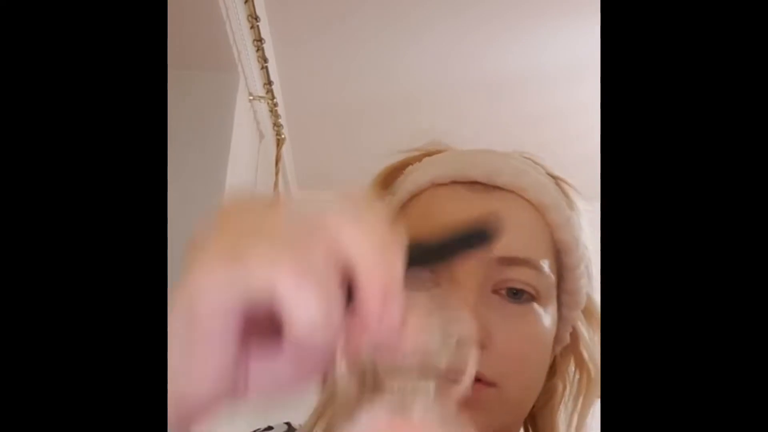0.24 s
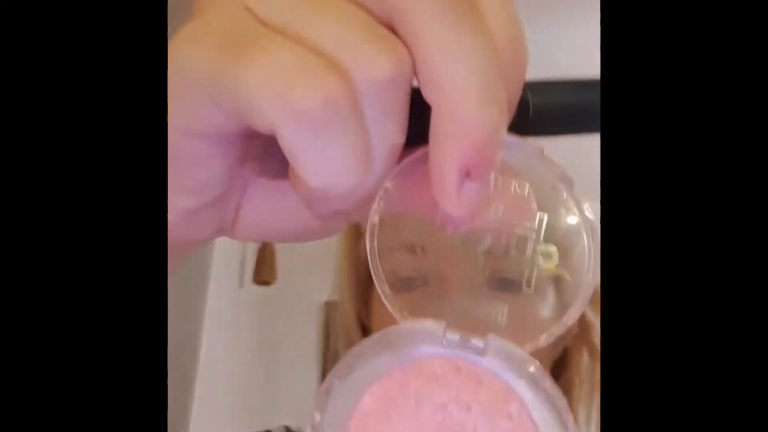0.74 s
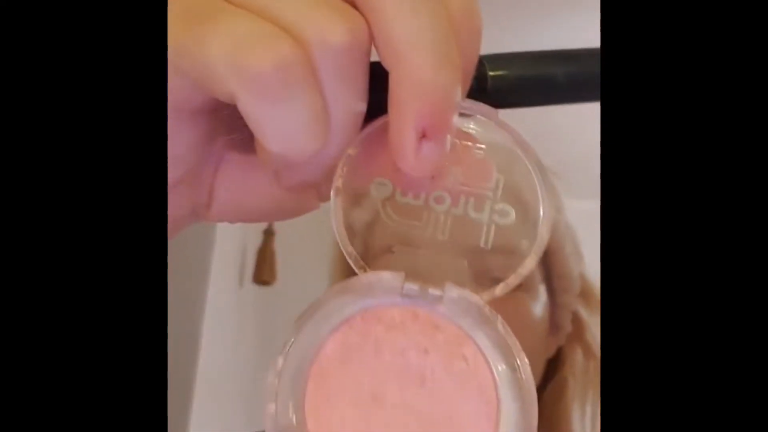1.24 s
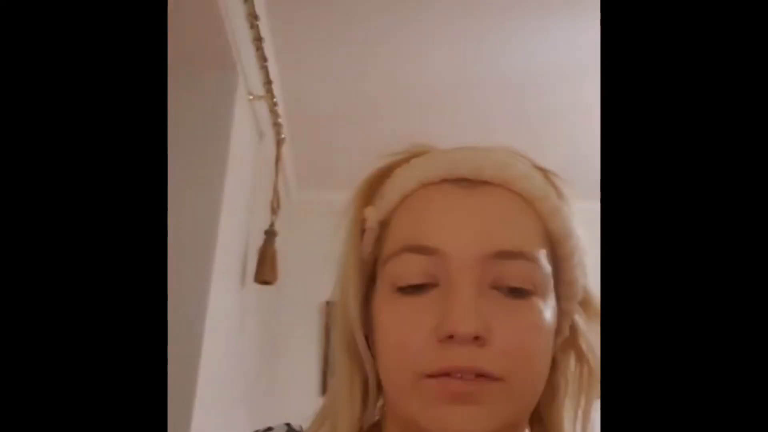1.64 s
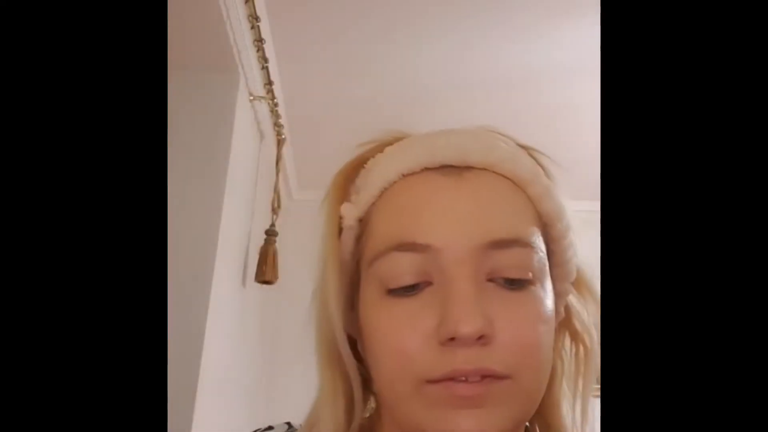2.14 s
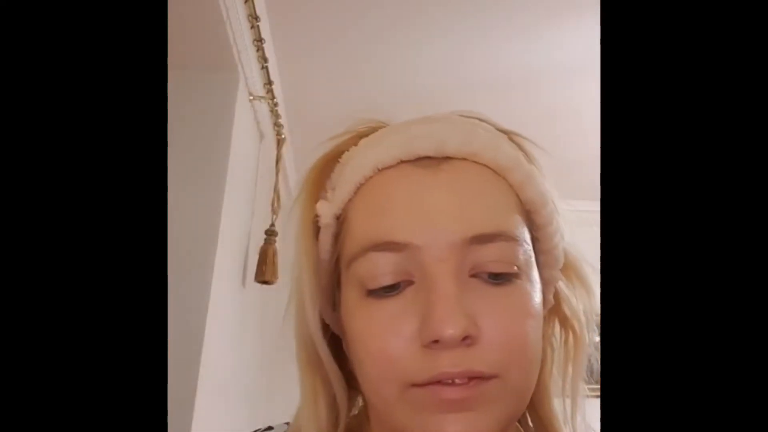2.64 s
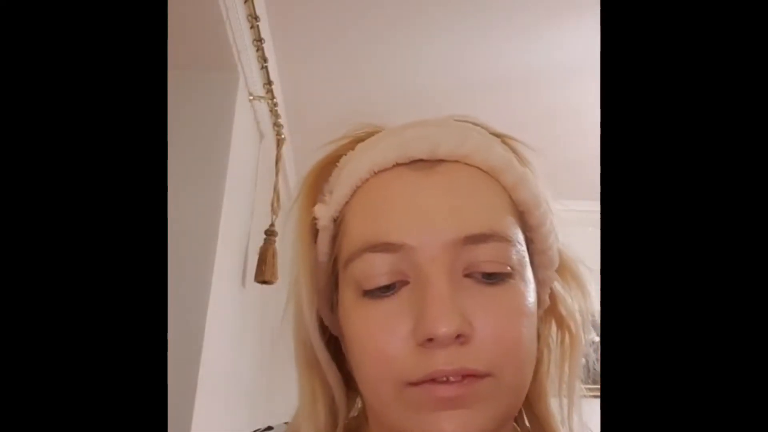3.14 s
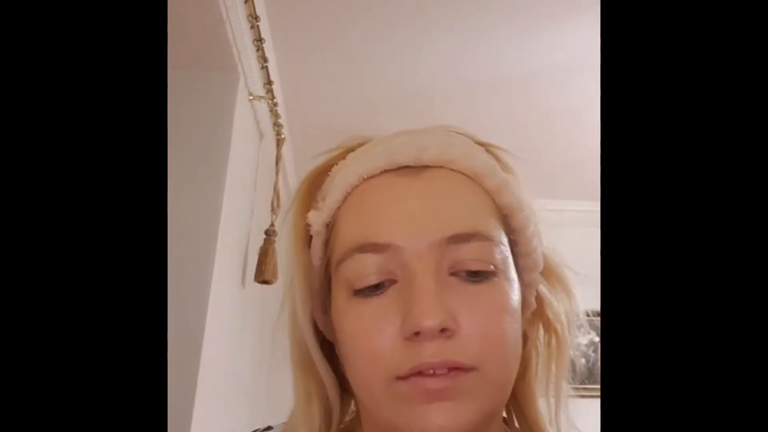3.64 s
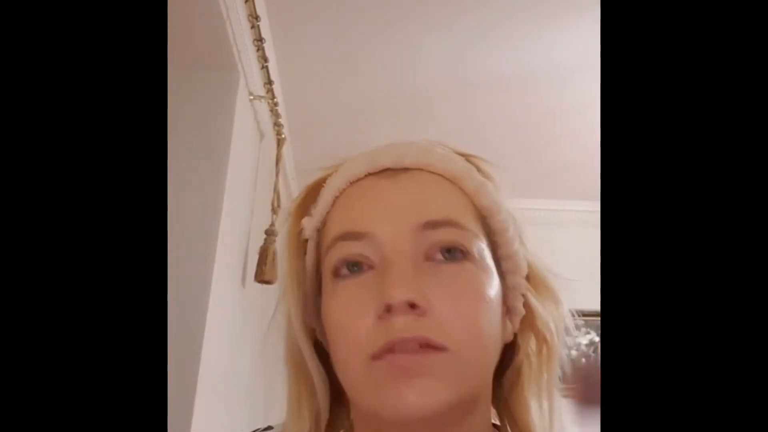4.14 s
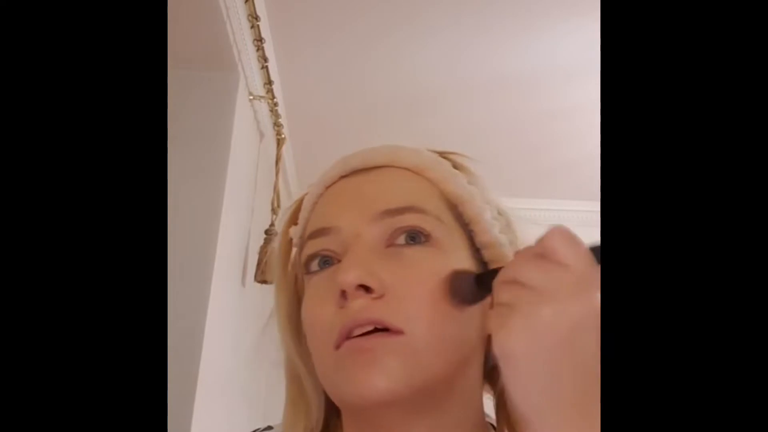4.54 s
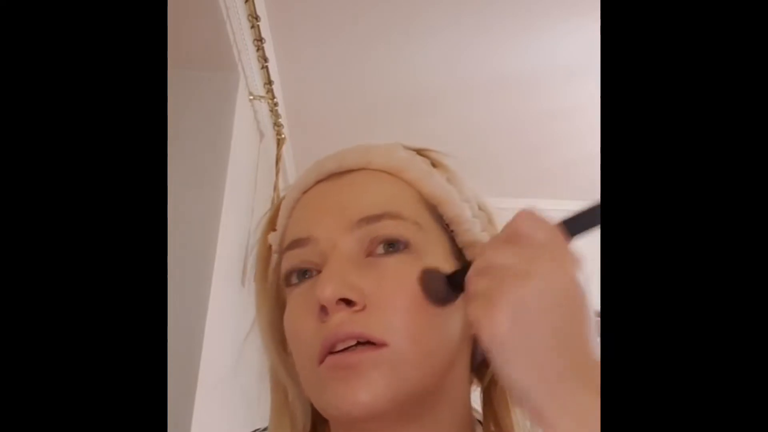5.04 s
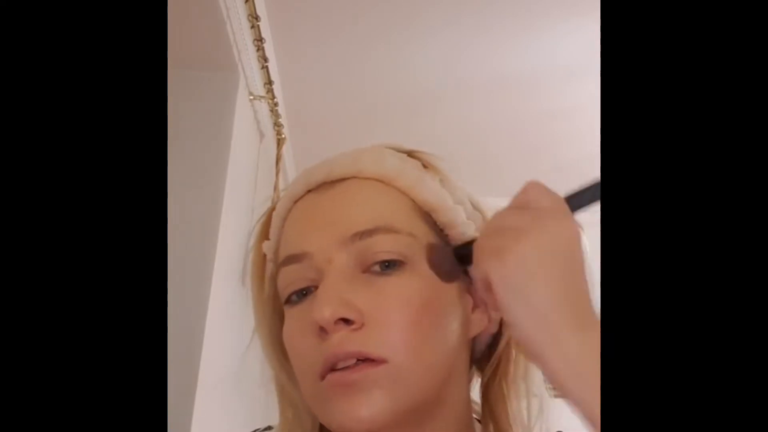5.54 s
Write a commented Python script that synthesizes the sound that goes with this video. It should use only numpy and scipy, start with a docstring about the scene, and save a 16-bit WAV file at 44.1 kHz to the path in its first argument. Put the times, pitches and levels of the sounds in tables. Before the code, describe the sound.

A plastic compact clicks open, is set down with a knock, then a brush handle taps it evenly and is laid down with a rattle.

```python
"""Powder compact and brush

A compact clicks open, its case is set down and nudged, the brush handle taps it and the brush is laid down
with a rattle. Each contact cracks, chatters, rings the plastic and thumps the table; the catch has no thump.
Soft bumps and dull knocks close the scene. A faint noise rustle wavers from amid the taps to the end, over a
wavering hum and hiss of noise bands; a small furnished room adds a few echoes and a short noise-like tail."""
import sys
import numpy as np
from scipy import signal
from scipy.fft import rfft, irfft
from scipy.io import wavfile
from scipy.ndimage import uniform_filter1d

SR = 44100
rng = np.random.default_rng(int(sys.argv[2]) if len(sys.argv) > 2 else 0)


def decibels_to_gain(level_db):
    """Convert a level in decibels to a linear amplitude gain (20 dB per decade)."""
    exponent = np.asarray(level_db, float) / 20
    return 10 ** exponent


def master(y):
    """Save y as 16-bit WAV."""
    cut = np.clip(np.atleast_2d(y).T, -1, 1)
    pcm = np.round(cut * 32767)  # scale
    wavfile.write(sys.argv[1], SR, pcm.astype(np.int16))


N = 255780  # length in samples


def colour(hz, points):
    """Reads a spectrum table at any frequency, in dB, along a logarithmic frequency axis."""
    table_hz, table_db = np.transpose(points)
    return np.interp(np.log(np.maximum(hz, 1)), np.log(table_hz), table_db)


def shaped(gain, size):
    """Two unrelated noises with the given gain per frequency bin."""
    return irfft(rfft(rng.standard_normal((2, size))) * gain, size)


def ring(modes, db, phase, seconds, rise_s=0.00021):
    """Sum of decaying modes, with extra dB and start phase per mode; they build up while contact lasts."""
    hz, mode_db, t60 = np.transpose(modes)[:, :, None]
    t = np.arange(int(seconds * SR)) / SR
    decay = np.exp(-np.log(1000) * t / t60)
    waves = decay * np.sin(2 * np.pi * hz * t + phase[:, None])
    return decibels_to_gain(mode_db[:, 0] + db) @ waves * (1 - np.exp(-t / rise_s)) ** 2


def add(out, s, sound):
    """Mixes a sound in at a time in seconds."""
    i = int(s * SR)
    out[i:i + len(sound)] += sound[:N - i]


# wavering hum bands: f/Hz, width/Hz, level/dB (rms of the part alike left and right)
HUM_BANDS = [(69.5, 7.9, -68.5), (156, 24, -79.5), (197, 3.5, -82), (242, 8, -88), (287, 3.8, -84),
             (340, 2.1, -79.5), (382, 8, -87), (440.7, 7.7, -77)]
# spectrum of air and microphone noise: f/Hz, relative level/dB (per Hz)
HISS_SPECTRUM = [(13, -39.5), (22, -15), (76, 2.5), (90, -0.5), (112, -29.5), (152, -17.5), (205, -27),
                 (223, -27), (347, -26.5), (409, -33), (444, -23), (569, -39.5), (1200, -46), (2700, -42),
                 (4380, -47.5), (9000, -60), (16000, -71)]


def background(hiss_db=-58.5, alike_hz=790.0, low_spread=0.089):
    """Narrow noise bands waver as hum over hiss; the bass is nearly alike left and right, the treble is not."""
    hz = np.fft.rfftfreq(N, 1 / SR)
    hiss = decibels_to_gain(colour(hz, HISS_SPECTRUM))
    power = decibels_to_gain(2 * hiss_db) * hiss ** 2 / np.mean(hiss ** 2)
    for centre_hz, width_hz, db in HUM_BANDS:
        peak = np.exp(-((hz - centre_hz) / width_hz) ** 2)
        power += decibels_to_gain(2 * db) * peak / np.mean(peak)
    mid, side = rfft(shaped(np.sqrt(power), N))
    spread = np.clip(low_spread + (hz / alike_hz) ** 1.9, 0, 1)
    return irfft(np.array([mid + spread * side, mid - spread * side]), N)


LEFT_LAG_S = .00032
# left minus right for the blows, which land to the right of the phone: f/Hz, level/dB
SHADOW = [(400, 0.36), (700, -4), (5000, -6.5), (9000, -11)]


def shade(hz, side):
    """Half the left-right level difference, in dB, for the left (0) or right (1) microphone."""
    return colour(hz, SHADOW) * (.5 - side)


def click(air, s, modes, db, facing, before_db=-30, before_s=0.0046, chatter_db=-28., chatter_s=0.009):
    """One contact, set in a short noise, rings the modes; the left microphone hears it later and shaded."""
    t = np.arange(-1000, 200) / SR
    # after first contact the parts chatter
    before = decibels_to_gain(before_db) * np.exp(-abs(t) / before_s)
    chatter = decibels_to_gain(chatter_db) * np.exp(-(t / chatter_s) ** 2)
    noise = np.where(t < 0, before, chatter) * rng.standard_normal(len(t))
    push = noise + (t == 0)
    for side in range(2):
        shadow_db = shade(np.array(modes)[:, 0], side)
        sound = signal.fftconvolve(ring(modes, db + shadow_db, facing[side], .08), push)
        add(air[side], s + t[0] + LEFT_LAG_S * (1 - side), sound)


# the crack of contact itself, under the rings: f/Hz, relative level/dB
CRACK_SPECTRUM = [(300, -23.5), (1000, -25.5), (2500, -22), (4000, -8.5), (5500, -14), (7500, -15),
                  (10000, -22), (15000, -24.5)]


def crack(cracks, s, db, treble_db, crack_s=.0015, size=512):
    """A short burst of noise, new at every contact, late and shaded at the left microphone."""
    hz = np.fft.rfftfreq(size, 1 / SR)
    centre = size // 4
    envelope = np.exp(-abs(np.arange(size) - centre) / SR / crack_s)
    burst = rfft(rng.standard_normal(size) * envelope)
    for side in range(2):
        gain = decibels_to_gain(db + colour(hz, CRACK_SPECTRUM) + treble_db * (hz > 6000) + shade(hz, side))
        add(cracks[side], s - centre / SR + LEFT_LAG_S * (1 - side), irfft(burst * gain, size))


# the lid's catch clicks open: t/s, level/dB
CATCH = (.0355, -22.5)
# ringing of the lid: f/Hz, relative level/dB, t60/s
LID = [(1185, -17.5, 0.014), (1750, -10, 0.01), (2050, -18, 0.024), (2704, -4, .008), (3210, -5, 0.023),
       (4430, -12, 0.028), (4760, -2.5, 0.017), (4970, 2.5, 0.0054), (5780, -1.5, .006),
       (6300, -15, 0.0052), (7270, -9, 0.011), (8600, -22, 0.0034), (9610, -15.5, 0.0044),
       (11700, -28, 0.00534)]


def open_catch(air, cracks, facing):
    """The catch lets go with a crack and sets the lid's modes ringing."""
    s, db = CATCH
    crack(cracks, s, db - 20, -4.5)
    click(air, s, LID, db, facing[:, :len(LID)])


# tail bands: f/Hz, relative level/dB, t60/s
TAIL_BANDS = [(150, -36.5, 0.74), (287, -37, 0.36), (606, -33, 0.28), (1200, -34.5, 0.31),
              (2370, -42.5, 0.33), (4800, -38.5, 0.32), (9600, -48.5, 0.33), (14230, -46, 0.093)]
# nearest surfaces: mean delay t/s (each side is then skewed), level/dB (midway between left and right)
ECHOES = [(.0035, -7.5), (.007, -16), (.0125, -14.5), (.018, -29), (0.023, -25.5)]
# what the shell throws into the room rather than at the phone: f/Hz, level/dB
THROW = [(200, 0.5), (370, 0), (500, -3.5), (680, -6.5), (900, -1.5), (1150, -11.5), (1600, -0.5),
         (3300, 0), (4100, -1), (4900, -6.5), (5700, -5.5), (6400, -5), (7500, -0.5), (9400, -7),
         (15000, 0)]


def room(near, far, onset_s=0.00059, alike_hz=500.):
    """A few sharp echoes and a noise-like tail with its own decay per band, more alike in the bass."""
    size = int(.6 * SR)
    t, hz = np.arange(size) / SR, np.fft.rfftfreq(size, 1 / SR)
    tail, echoes = np.zeros((2, size)), np.zeros((2, size // 10))
    for centre_hz, db, t60 in TAIL_BANDS:
        octaves = np.log2(np.maximum(hz, 1) / centre_hz)
        mid, side = shaped(np.exp(-octaves ** 2 * 2) * decibels_to_gain(colour(hz, THROW)), size)
        band = mid + min(centre_hz / alike_hz, 1) * side * np.array([[1], [-1]])
        shadow_db = shade(centre_hz, np.array([[0], [1]]))
        tail += decibels_to_gain(db - 60 * t / t60 + shadow_db) * band * (1 - np.exp(-t / onset_s))
    skew_s = rng.uniform(-0.00033, 0.00025, (len(ECHOES), 2))
    for (s, db), skew in zip(ECHOES, skew_s):
        echoes[[0, 1], ((s + skew) * SR).astype(int)] += decibels_to_gain(db + np.array([-1.8, 1.8]))
    early = signal.fftconvolve(near[None], echoes, axes=1)[:, :N]
    late = signal.fftconvolve(far[None], tail, axes=1)[:, :N]
    return early + late


# table top modes: f/Hz, relative level/dB, t60/s
TABLE_TOP = [(42, -12, 0.11), (82.04, -4.5, .3), (101, 4.5, 0.11), (117.05, -2.5, 0.18), (168.5, -6, 0.1),
             (226.4, -9.5, 0.25), (275.5, 3, 0.18), (359.5, -11, .08), (437, -12, 0.085)]


def thump(db, push_s, bass_db, scatter_db=3.0, rise_s=0.0026, settle_s=0.069):
    """A rounded push rings the table top, each time with another mix of modes; it springs back to rest."""
    deep = np.array(TABLE_TOP)[:, 0] < 150
    mix_db = scatter_db * rng.standard_normal(len(TABLE_TOP)) + bass_db * deep
    modes = ring(TABLE_TOP, mix_db, np.zeros(len(TABLE_TOP)), .6, rise_s=rise_s)
    settled = modes - uniform_filter1d(modes, int(settle_s * SR))
    sound = np.convolve(settled, np.hanning(max(int(push_s * SR), 3)))
    return decibels_to_gain(db) * sound / np.abs(sound).max()


# plastic shell and handle, before each grip detunes them: f/Hz, relative level/dB, t60/s
SHELL = [(432, -10, 0.047), (527, -16.5, 0.053), (634, -10.5, 0.046), (749.8, -3.5, 0.021),
         (852, -21.5, 0.021), (1052, -5, 0.027), (1185.7, -7.5, 0.039), (1744, -2.5, 0.017),
         (2146, -9, 0.015), (2447, -2, 0.0062), (3100, -3.5, 0.0077), (3540, -6.5, 0.004),
         (3660, -3.5, 0.007), (4230, 2.5, 0.0057), (4812, -5.5, .011), (5430, -7.5, 0.0081),
         (5700, -17.5, 0.0086), (6404, -9.5, 0.01), (7600, -21.5, 0.0064), (8500, -23, 0.001),
         (9510, -14.5, 0.0064), (10300, -19.5, .003), (11450, -16.5, 0.0045), (12400, -15.5, .003),
         (14400, -15.5, 0.0075), (14600, -16, 0.0016), (16090, -21.5, .003)]


def shell_phases(side_turn=0.86):
    """Neighbouring modes start in opposite sense, and each sends its own phase to each side."""
    count = len(SHELL)
    return np.pi * np.arange(count) + side_turn * rng.standard_normal((2, count))


def strike(layers, facing, s, db, thump_db, ring_hz, body_db, treble_db, bass_db,
           scatter_db=0.5, favour_db=6.0, favour_octaves=0.27, detune=.015, crack_db=-16.5):
    """One blow rings the shell, cracks in the air and thumps the table."""
    air, cracks, table = layers
    held = np.array(SHELL)
    hz = held[:, 0].copy()
    # where the blow lands favours some modes; a heavier one wakes the body, a harder edge the treble
    lift_db = favour_db * np.exp(-(np.log2(hz / ring_hz) / favour_octaves) ** 2)
    lift_db += body_db * (hz < 1500) + treble_db * (hz > 6000)
    lift_db += scatter_db * rng.standard_normal(len(hz))
    held[:, 0] *= 1 + detune * rng.standard_normal(len(hz))  # the grip shifts every mode a little
    click(air, s, held, db + lift_db, facing)
    crack(cracks, s, db + crack_db + .35 * treble_db, treble_db)
    add(table, s, thump(thump_db, 0.0018, bass_db))


# the case is set down and nudged: t/s, level/dB, table thump level/dB, favoured ring f/Hz, treble level/dB
NUDGES = [(1.8763, -7, -22.5, 1783, -9.5), (2.080, -28, -47.5, 3472, -1), (2.2584, -9.5, -28.5, 4756, -1.5),
          (3.919, -57, -70, 2930, -5.5), (5.517, -65.5, -41.5, 3033, 6.5)]


def nudge_case(layers, facing):
    """The case meets the table, each blow favouring its own modes, with little body and deep bass."""
    for s, db, thump_db, ring_hz, treble_db in NUDGES:
        strike(layers, facing, s, db, thump_db, ring_hz, body_db=-3.5, treble_db=treble_db, bass_db=-6)


# brush handle tapped on the case: t/s, level/dB, table thump level/dB
TAPS = [(2.329, -3.5, -23.5), (2.546, -7.5, -23), (2.741, -10.5, -26.5), (2.937, -9, -19.5),
        (3.132, -7, -21.5), (3.331, -9, -21), (3.513, -8.5, -21), (3.69, -9, -24.5)]


def tap_handle(layers, facing):
    """The handle strikes the case with a bright edge, favouring the same modes at every tap."""
    for s, db, thump_db in TAPS:
        strike(layers, facing, s, db, thump_db, 4280, body_db=-0.8, treble_db=4, bass_db=1.75)


# spectrum of the faint rustle: f/Hz, relative level/dB (per Hz)
RUSTLE_SPECTRUM = [(800, -30.5), (2000, -4), (4000, 1.5), (7000, -0.5), (9000, -22.5)]


def rustle_on(start_s=2.8, db=-84.5, waver_hz=2.0, depth_db=2.5, fade_s=0.068):
    """A faint noise rustle fades in amid the taps and wavers in level to the end."""
    t = np.arange(N) / SR - start_s
    rustle = shaped(decibels_to_gain(colour(np.fft.rfftfreq(N, 1 / SR), RUSTLE_SPECTRUM)), N)
    waver = np.clip(t / fade_s, 0, 1) * decibels_to_gain(depth_db * np.cos(2 * np.pi * waver_hz * t))
    return decibels_to_gain(db) * waver * rustle / rustle.std()


# the brush bounces as it is laid down: t/s, level/dB, favoured ring f/Hz
BOUNCES = [(4.140, -18.5, 4090), (4.151, -23.5, 4800), (4.159, -19.5, 3029), (4.171, -24, 4780),
           (4.182, -31, 4810), (4.19, -29.5, 3580), (4.21, -36.5, 599), (4.222, -40, 600)]


def lay_brush_down(layers, facing):
    """A rattle of quick contacts, dull in the treble, each with its thump 14 dB under its level."""
    for s, db, ring_hz in BOUNCES:
        strike(layers, facing, s, db, db - 14, ring_hz, body_db=-0.7, treble_db=-8, bass_db=-1.5)


# soft bumps felt through the table: t/s, level/dB, push length t/s
BUMPS = [(5.496, -40, 0.0052), (5.506, -34, 0.0056), (5.624, -55, 0.0075)]


def bump_table(table):
    """Longer, softer pushes ring the table top without any click."""
    for s, db, push_s in BUMPS:
        add(table, s, thump(db, push_s, bass_db=1.75))


# small dull knocks: t/s, level/dB, ring f/Hz, t60/s
KNOCKS = [(5.689, -59, 1010, .03), (5.705, -57.5, 830, 0.068)]


def knock(table):
    """Each knock is one decaying mode with a soft rise."""
    for s, db, knock_hz, t60 in KNOCKS:
        add(table, s, ring([(knock_hz, db, t60)], 0, np.zeros(1), .09, rise_s=0.0027))


def scene(crack_room_db=18):
    """Blows in the air and through the table, their room, the rustle and the hum."""
    air, cracks, table = layers = np.zeros((2, N)), np.zeros((2, N)), np.zeros(N)
    facing = shell_phases()
    open_catch(air, cracks, facing)
    nudge_case(layers, facing)
    tap_handle(layers, facing)
    lay_brush_down(layers, facing)
    bump_table(table)
    knock(table)
    near = (air + cracks).mean(0) + .5 * table
    # the crack spreads in all directions, so the tail gets more of it than the phone
    far = near + decibels_to_gain(crack_room_db) * cracks.mean(0)
    direct = air + cracks + table * decibels_to_gain(np.array([[-.6], [.6]]))
    return direct + room(near, far) + rustle_on() + background()


def band_limit(x):
    """A steep low-pass at the top of the band."""
    return signal.sosfilt(signal.butter(12, 16530, fs=SR, output="sos"), x)


def record(dry):
    """The phone drops the deepest bass, rounds the loudest peaks and cuts the top."""
    bass_cut = signal.butter(2, 30, "high", fs=SR, output="sos")
    top_cut = signal.ellip(8, .2, 60, 16400, fs=SR, output="sos")
    rounded = np.tanh(signal.sosfilt(bass_cut, dry))
    mix = signal.sosfilt(top_cut, rounded)
    return band_limit(mix)


dry = scene()
out = record(dry)
master(out)
```